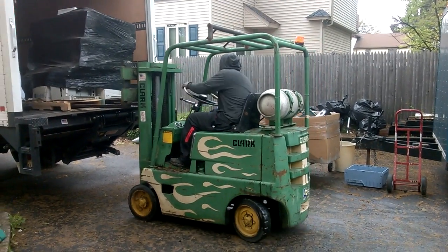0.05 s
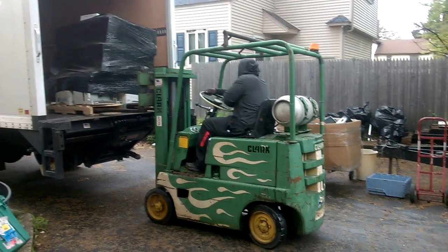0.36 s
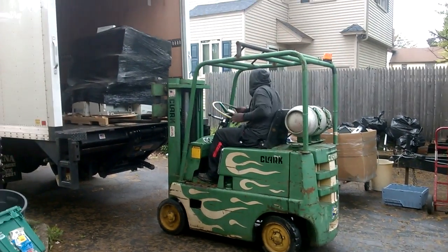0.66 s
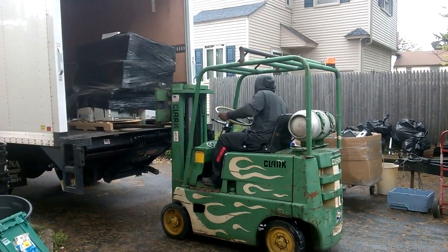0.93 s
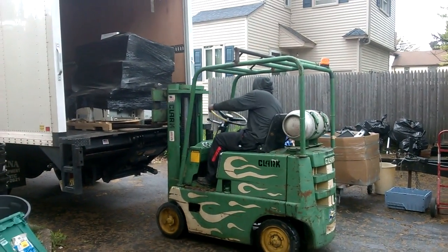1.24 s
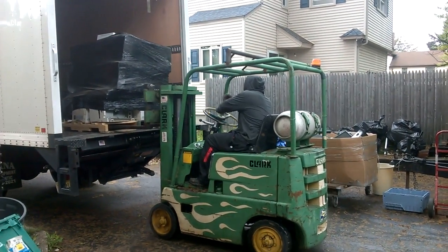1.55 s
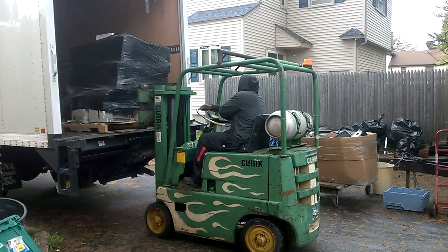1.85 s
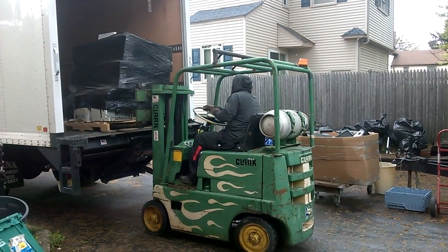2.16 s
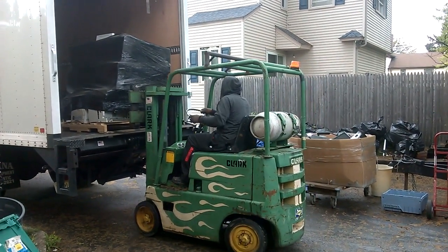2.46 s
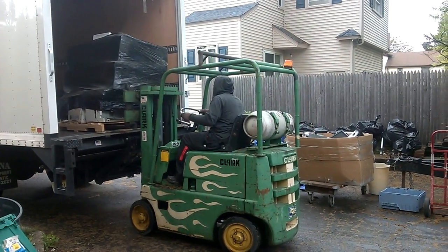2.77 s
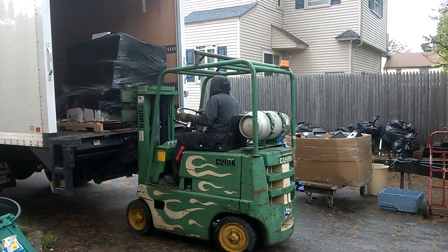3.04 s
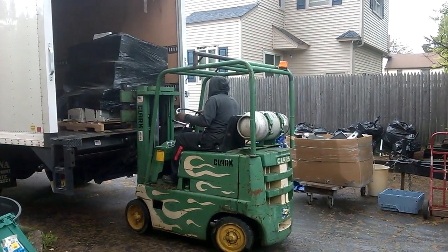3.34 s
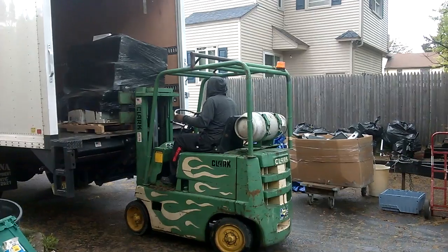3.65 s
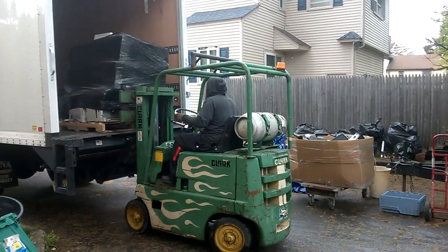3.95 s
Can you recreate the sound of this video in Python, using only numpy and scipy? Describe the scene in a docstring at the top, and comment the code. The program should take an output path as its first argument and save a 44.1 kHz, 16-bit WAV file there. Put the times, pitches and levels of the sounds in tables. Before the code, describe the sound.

A forklift engine idles with rapid chugging, a spitting hiss and light metal clanks.

```python
"""An open yard, one microphone a few metres from a four-cylinder propane forklift creeping nearer at idle.
Each firing thumps through the exhaust pipe, chuffs against the ringing steel body and spits a hiss
from a leak; one cylinder spits harder than the rest. Loose steel parts clank now and then, and a dull
clunk comes near the end. Behind it lie short echoes off truck, fence and house, and a distant rumble."""
import sys
import numpy as np
from scipy import signal
from scipy.fft import rfft, irfft
from scipy.io import wavfile

SR = 44100
rng = np.random.default_rng(int(sys.argv[2]) if len(sys.argv) > 2 else 0)


def generate_wav(signal):
    """Clip the signal to [-1, 1] and save it as 16-bit WAV at the path in sys.argv[1]."""
    frames = np.transpose(np.atleast_2d(signal))
    scaled = np.clip(frames, -1, 1) * 32767
    pcm = np.round(scaled).astype(np.int16)
    wavfile.write(sys.argv[1], SR, pcm)


N = 176400
LEAD = SR // 4  # samples of margin at each end, and the length of one puff
TIME = np.arange(-LEAD, N + LEAD) / SR
FREQ = np.arange(len(TIME) // 2 + 1) * SR / len(TIME)


def undb(db):
    """Decibels to gain."""
    return 10 ** (np.asarray(db) / 20)


def unit(x):
    """Scale to rms 1."""
    return x / np.sqrt(np.mean(x ** 2))


def noise():
    """White noise."""
    return rng.standard_normal(len(TIME))


def through(x, response):
    """Filter by a frequency response."""
    return irfft(rfft(x) * response, len(x))


def spectrum_db(colour, freq):
    """Level at each frequency, read from (frequency [Hz], level [dB]) points."""
    hz, db = np.array(colour).T
    return np.interp(np.log(freq + 1), np.log(hz), db)


def coloured(colour):
    """Steady noise of the given colour, at rms 1."""
    return unit(through(noise(), undb(spectrum_db(colour, FREQ))))


def resonance(hz, width):
    """Response of one resonance, gain 1 at its centre."""
    return 1j * FREQ * width / (hz ** 2 - FREQ ** 2 + 1j * FREQ * width)


def drift(rate_hz):
    """Slow random drift with spread 1."""
    return unit(through(noise(), np.exp(-(FREQ / rate_hz) ** 2)))


def puff(age, attack_s, decay_s):
    """Envelope that rises evenly, then dies away."""
    return np.clip(age / attack_s, 0, 1) * np.exp(-np.maximum(age - attack_s, 0) / decay_s)


def puffs(times, db, attack_s, decay_s, steady):
    """Envelope of one puff of gas per firing over a steady flow."""
    power = np.full(len(TIME), steady ** 2)
    for start, gain in zip(times, undb(db - np.mean(db))):
        i = np.searchsorted(TIME, start)
        power[i:i + LEAD] += (gain * puff(TIME[i:i + LEAD] - start, attack_s, decay_s)) ** 2
    return np.sqrt(power)


def spurts(colour, times, db, attack_s, decay_s, steady, ripple_hz):
    """A burst of gas per firing, each with chance peaks in its colour, over a duller steady flow."""
    ripple_db, flow_top_hz = 4, 12500
    freq = np.arange(LEAD // 2 + 1) * SR / LEAD
    colour_db = spectrum_db(colour, freq)
    envelope = puff(np.arange(LEAD) / SR, attack_s, decay_s)
    gas = steady * through(coloured(colour), 1 / np.hypot(1, (FREQ / flow_top_hz) ** 4))
    for start, gain in zip(times, undb(db - np.mean(db))):
        peaks = np.interp(freq / ripple_hz, np.arange(len(freq)), rng.standard_normal(len(freq)))
        burst = unit(through(rng.standard_normal(LEAD), undb(colour_db + ripple_db * peaks)))
        i = np.searchsorted(TIME, start)
        gas[i:i + LEAD] += (gain * burst * envelope)[:len(TIME) - i]
    return gas


def distant_rumble():
    """The low, steady background of the yard, far from the microphone."""
    # colour of the rumble (frequency [Hz], level [dB])
    colour = [(15, -30), (30, -8), (60, -9), (100, -5), (160, -16.5), (300, -15.5), (1000, -21),
              (3000, -50), (6000, -73), (16000, -59)]
    return undb(-53.5) * coloured(colour)


def yard_echoes(sound):
    """Short scattered echoes come back from truck, fence and house."""
    echoes = noise() * puff(TIME - TIME[0], attack_s=0.0084, decay_s=0.073)
    return undb(-14.5) * through(sound, rfft(echoes / np.linalg.norm(echoes)))


def clunk(start_s):
    """A soft, dull knock as the forklift reaches the truck."""
    # colour of the clunk (frequency [Hz], level [dB])
    colour = [(150, -31), (280, 4), (390, 7.5), (480, 4.5), (600, 4.5), (750, -0.5), (900, -7.5),
              (1400, -4), (2500, -35)]
    return undb(-38.5) * coloured(colour) * puff(TIME - start_s, attack_s=0.017, decay_s=0.062)


def clanks():
    """Now and then a loose panel or part is jolted and rings briefly around its own pitch."""
    # jolts of loose steel (time [s], level [dB], pitch [Hz], width [Hz])
    jolts = [(.842, -41.5, 1510, 500), (.946, -44, 2180, 900), (1.524, -42, 1380, 600),
             (1.736, -38, 1310, 350), (1.79, -42.5, 2230, 1000), (1.959, -41, 1240, 400),
             (2.165, -42.5, 1700, 1200), (2.48, -41.5, 1500, 200), (2.734, -40, 2100, 250),
             (2.843, -44, 2340, 1100), (3.164, -44, 2110, 1200), (3.373, -45, 2300, 600),
             (3.904, -40, 2450, 900)]
    steel = np.zeros(len(TIME))
    for start, db, hz, width in jolts:
        ring = unit(through(noise(), resonance(hz, width) ** 2))
        steel += undb(db) * ring * puff(TIME - start, attack_s=0.0072, decay_s=0.028)
    return steel


def rattle(times, db):
    """Loose parts ring after each firing, each with its own pitch, start and strength."""
    parts, spread_s, low_hz, high_hz = 5, 0.012, 1150, 3200
    tilt_db_per_octave, scatter_db = 0.5, 5
    rings = np.zeros(len(TIME))
    for firing, level in zip(np.repeat(times, parts), np.repeat(db, parts)):
        octaves = rng.random() * np.log2(high_hz / low_hz)
        start = firing + rng.random() * spread_s
        gain = undb(level + tilt_db_per_octave * octaves + scatter_db * rng.standard_normal())
        i = np.searchsorted(TIME, start)
        age = TIME[i:i + LEAD] - start
        tone = np.sin(2 * np.pi * low_hz * 2 ** octaves * age)
        rings[i:i + LEAD] += gain * puff(age, attack_s=0.0011, decay_s=0.008) * tone
    return unit(rings)


def leak(times, db):
    """A sharp spit of gas escapes from an exhaust leak at each firing."""
    # colour of the hiss (frequency [Hz], level [dB])
    colour = [(3000, -45), (4800, -19), (5900, -13), (7000, 3.5), (8200, 4), (9500, 9.5), (11300, 6),
              (13400, -4.5), (15000, 2), (17500, -13)]
    return unit(spurts(colour, times, db, attack_s=0.0076, decay_s=0.021, steady=0.1, ripple_hz=260))


def steel_body(drive):
    """The steel body rings; its modes swell and fade as it moves."""
    # modes of the body (frequency [Hz], width [Hz], level [dB])
    modes = [(621, 23.5, 5.5), (719.4, 42, 4), (820.5, 17, 6.5), (913, 11, 6), (1187, 55, 5), (1302, 40, 7),
             (1413, 50, 8.5), (1511, 45, 7), (2147, 80, 4.5), (2442, 16, 2), (3204, 87, -3.5)]
    wander_db = 2.5
    ring = np.zeros(len(TIME))
    for hz, width, db in modes:
        ring += undb(db + wander_db * drift(rate_hz=13)) * through(drive, resonance(hz, width))
    return unit(ring)


def chuffs(times, db):
    """Bursts of gas, each with a hollow knock at its heart, ring the body; loose parts rattle."""
    # colours of the gas and of the knock (frequency [Hz], level [dB])
    gas_colour = [(150, 15), (300, 5), (450, -13.5), (700, 5), (1000, -0.5), (1400, 8.5), (1830, 0),
                  (2300, 5.5), (3000, 1), (3800, -6), (4600, -19), (6000, -45), (9000, -11.5)]
    knock_colour = [(150, -19), (300, -0.5), (450, -6.5), (620, 4.5), (800, 4), (1050, -10), (2000, -49)]
    shape = dict(attack_s=0.0083, decay_s=0.026, steady=0.16)
    body = steel_body(noise() * puffs(times, db, **shape))
    gas = unit(spurts(gas_colour, times, db, **shape, ripple_hz=110))
    parts = rattle(times, db)
    knock = unit(coloured(knock_colour) * puffs(times, db, attack_s=0.021, decay_s=0.0067, steady=0.013))
    return unit(gas + undb(-3.5) * body + undb(-11) * parts + undb(-11.5) * knock)


def burble(times, db):
    """Gas burbles low in the pipe after each firing."""
    # colour of the burble (frequency [Hz], level [dB])
    colour = [(20, -43), (55, -43), (95, 5), (135, -33), (160, -2), (200, -1), (250, -7.5), (330, -20),
              (600, -37), (2000, -81)]
    return unit(coloured(colour) * puffs(times, db, attack_s=0.022, decay_s=0.025, steady=0.22))


def exhaust(times, db):
    """Rounded pressure pulses ring the pipe and echo off a near surface; the gas burbles after each."""
    # resonances of the exhaust pipe (frequency [Hz], width [Hz], level [dB], polarity [+1 or -1])
    modes = [(53.95, 11.7, -10, -1), (87, 17.4, -8, 1), (100, 76, -10.4, -1), (137.4, 9.5, 1, 1),
             (175.8, 13.1, -1.94, -1), (203.7, 26, -6.5, 1)]
    lag_s, rise_s, echo_s, cut_hz = 0.0028, 0.0021, 0.00318, 32.4
    pulses = np.zeros(len(TIME))
    pulses[np.searchsorted(TIME[:-1], times + lag_s)] = undb(db)
    s = 2j * np.pi * FREQ
    pipe = sum(polarity * undb(level) * resonance(hz, width) for hz, width, level, polarity in modes)
    echo = 1 + 0.9 * np.exp(-s * echo_s)
    outlet = -FREQ ** 2 / (cut_hz ** 2 - FREQ ** 2 + 1j * np.sqrt(2) * FREQ * cut_hz)  # high-pass
    rounding = 1 / (1 + s * rise_s) ** 2
    thumps = unit(through(pulses, pipe * echo * outlet * rounding))
    burble_db = -18.5 + TIME  # gains 1 dB a second on the thumps as the forklift nears
    return thumps + undb(burble_db) * burble(times, db)


def firings():
    """Four cylinders fire in turn at a wavering idle: times, and levels of thump, chuff and hiss."""
    # engine speed (time [s], firing rate [1/s])
    speed = [(0.0, 18.535), (0.25, 18.375), (0.5, 19.765), (0.75, 19.054), (1.0, 18.991), (1.25, 19.141),
             (1.5, 19.036), (1.75, 18.257), (2.0, 18.709), (2.25, 19.182), (2.5, 19.557), (2.75, 18.832),
             (3.0, 18.584), (3.25, 19.184), (3.5, 19.076), (3.75, 18.733), (4.0, 17.99)]
    # cylinders in firing order (lateness [s], thump [dB], chuff [dB], hiss [dB])
    cylinders = [(.0003, -5.5, 2.5, 7.5), (.0007, -5, 3, 11.5), (.0001, -4, 0.1, 8),
                 (-.0009, -4.5, -1.5, 7.5)]
    scatter = [0.00022, 0.46, 1.3, 1]  # from firing to firing, same columns
    count = np.cumsum(np.interp(TIME, *np.array(speed).T)) / SR
    count = count - count[LEAD] - 0.858  # firing 0 falls this share of an interval after time zero
    number = np.arange(-len(cylinders), int(count[-1]))
    rows = np.array(cylinders)[number % len(cylinders)]
    late_s, thump_db, chuff_db, hiss_db = (rows + rng.standard_normal(rows.shape) * scatter).T
    return np.interp(number, count, TIME) + late_s, thump_db, chuff_db, hiss_db


def scene():
    """The forklift nears the microphone; chuffs, hiss, clanks and clunk echo round the yard."""
    # loudness of the approaching engine (time [s], thump [dB], chuff [dB], hiss [dB])
    approach = [(0, -36.5, -45, -51.5), (.3, -37.5, -44, -50.5), (.7, -35.5, -43.5, -50.5),
                (1.55, -34.6, -43, -50), (1.8, -37.5, -42, -48.5), (2.2, -34, -42, -50),
                (2.8, -33.5, -40.5, -49), (3.3, -32.2, -40, -49), (4, -32.5, -39.5, -47)]
    at, *levels = np.array(approach).T
    thump_gain, chuff_gain, hiss_gain = (undb(np.interp(TIME, at, db)) for db in levels)
    times, thump_db, chuff_db, hiss_db = firings()
    bright = chuff_gain * chuffs(times, chuff_db) + hiss_gain * leak(times, hiss_db)
    bright += clanks() + clunk(start_s=3.825)
    mix = thump_gain * exhaust(times, thump_db) + bright + yard_echoes(bright) + distant_rumble()
    return mix[None, LEAD:LEAD + N]


def record(dry):
    """The recorder cuts the top of the treble steeply."""
    top_hz = 17300
    return signal.sosfilt(signal.ellip(10, .1, 80, top_hz, fs=SR, output="sos"), dry)


dry = scene()
out = record(dry)
generate_wav(out)
```